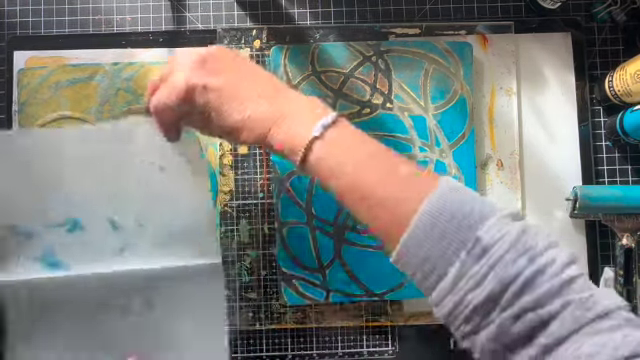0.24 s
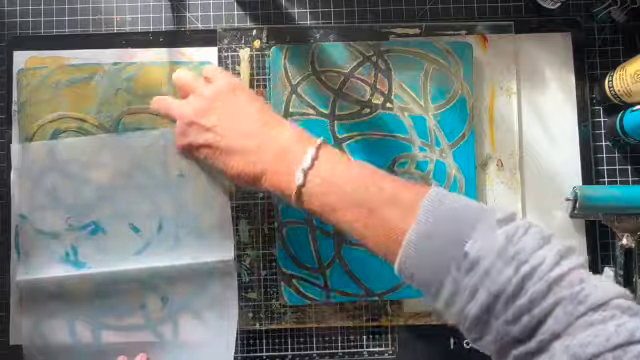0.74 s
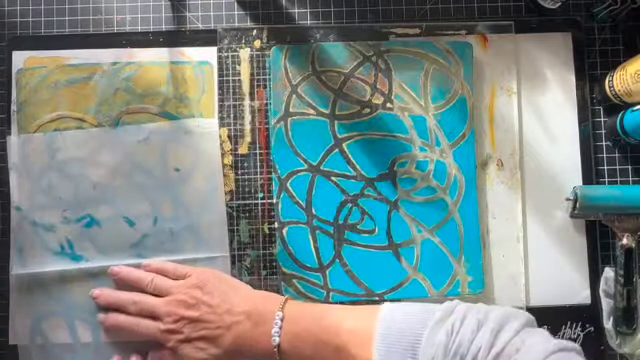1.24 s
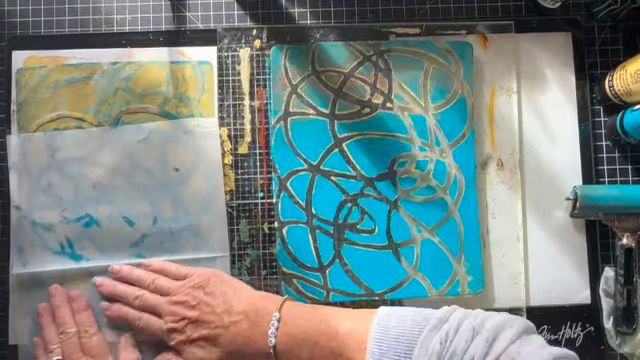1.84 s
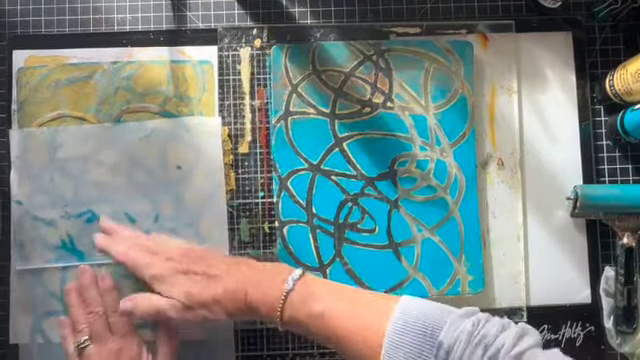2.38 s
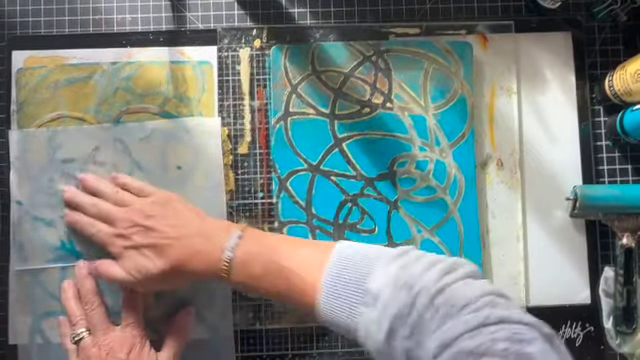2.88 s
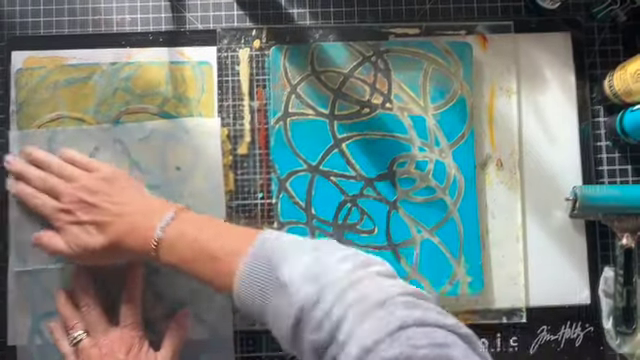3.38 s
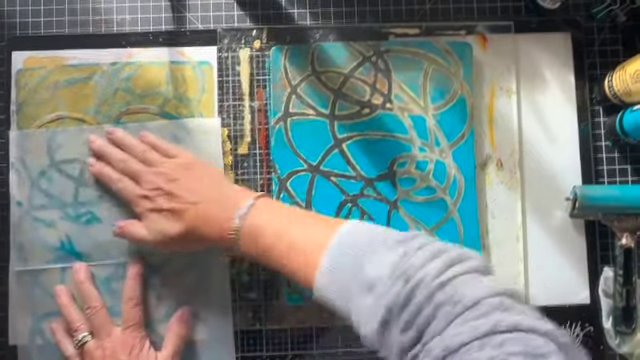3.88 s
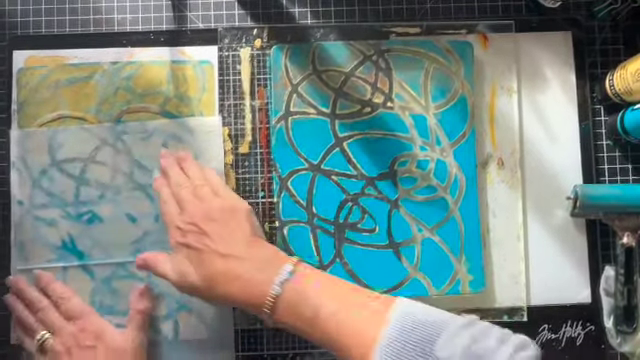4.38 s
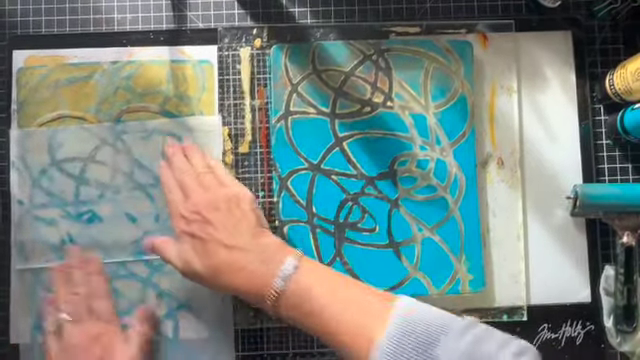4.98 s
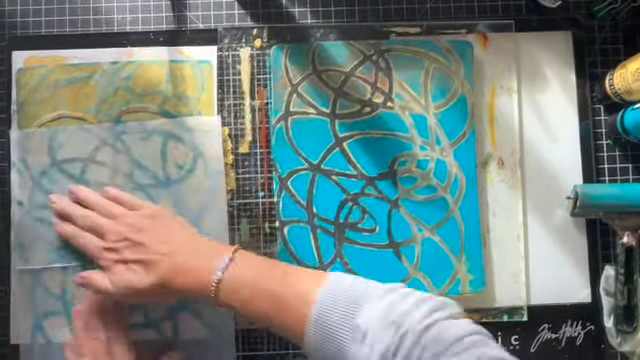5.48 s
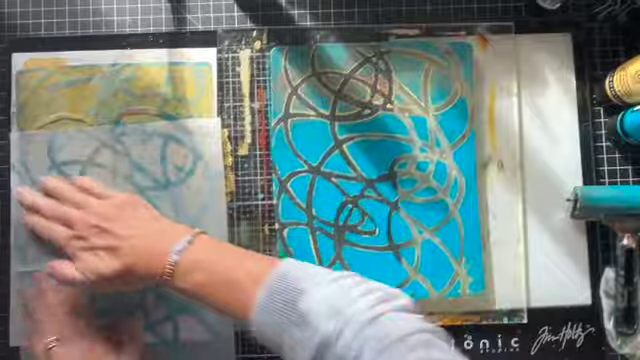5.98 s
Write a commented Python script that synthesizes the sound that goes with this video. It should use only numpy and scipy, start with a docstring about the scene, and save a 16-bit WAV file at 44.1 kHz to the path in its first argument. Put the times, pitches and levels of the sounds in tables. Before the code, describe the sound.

Close up at a craft table in a quiet airy room with a faint low hum, a thin sheet is laid down: irregular crisp snaps, brief crinkles and low air puffs. From two seconds a hand rubs it in short dry hisses, with small ticks, light crackles and hollow knocks, strongest near three and four and a half seconds.

```python
"""A hand rubs a thin sheet of paper flat on a craft table, close under two microphone ports.
Skin hisses as dense noise grains in short strokes; the sheet crinkles as dense ringing grains
and snaps as short pitched flips. The table top drums, knocks and rattles as noise through its modes.
The falling sheet puffs air, small ticks sound, and a machine hums in the airy room."""
import sys
import numpy as np
from scipy import signal
from scipy.fft import rfft, irfft, next_fast_len
from scipy.io import wavfile
from scipy.ndimage import uniform_filter1d

SR = 44100
rng = np.random.default_rng(int(sys.argv[2]) if len(sys.argv) > 2 else 0)


def transcribe(signal):
    """Save signal, clipped to [-1, 1], as a 16-bit WAV file at the path in sys.argv[1]."""
    frames = np.atleast_2d(signal).T
    limited = np.clip(frames, -1, 1)
    pcm = np.round(limited * 32767).astype(np.int16)
    wavfile.write(sys.argv[1], SR, pcm)


N = 274743

# Strokes of the hand. Each row: start in seconds, length in seconds, full hiss level in dB.
STROKES = [(2.002, 0.11, -36.5), (2.171, 0.11, -39.5), (2.349, 0.035, -44), (2.461, 0.21, -45),
           (2.751, 0.095, -41.5), (2.876, 0.13, -41.5), (3.032, 0.12, -40.5), (3.185, 0.13, -41.5),
           (3.347, 0.26, -43.5), (3.659, 0.11, -40), (3.815, 0.098, -45.5), (3.953, 0.17, -43),
           (4.194, 0.11, -38.5), (4.396, 0.16, -33.5), (4.566, 0.17, -38.5), (4.738, 0.14, -35.5),
           (4.889, 0.13, -36), (5.032, 0.15, -39.5), (5.189, 0.29, -39.5), (5.507, 0.13, -39),
           (5.664, 0.1, -37), (5.806, 0.35, -39.5), (6.17, 0.098, -36.5)]
# Hand pressing the table. Each row: time in seconds, rattle of the top in dB, favoured mode in Hz.
PRESSURE = [(0, -59, 395), (1.5, -64, 304), (1.9, -45, 325), (2.4, -66, 460), (2.47, -52.5, 620),
            (2.66, -49, 910), (2.95, -64, 400), (3.05, -33.5, 530), (3.4, -60, 454), (3.74, -55, 424),
            (3.83, -43.5, 586), (3.95, -56.5, 517), (4.12, -40.5, 597), (4.28, -51.5, 594), (4.6, -58, 660),
            (5.3, -57, 594), (5.8, -48, 425), (6.23, -82, 402)]
# Snaps of the sheet. Each row: start in seconds, level in dB, ring in Hz, relative treble in dB.
SNAPS = [(0.229, -21, 1330, -27), (0.3373, -27, 2420, -30), (0.7158, -15, 3270, -12),
         (0.752, -20.5, 2540, -6), (1.085, -35, 2000, -23), (1.2261, -31, 1490, -37),
         (1.303, -32, 2410, -32), (1.3289, -22, 2720, -6), (1.351, -37, 1900, -21),
         (1.3609, -24.5, 1800, -10), (1.577, -30.5, 2260, -10), (1.8021, -12, 2860, -8),
         (1.899, -32.5, 2530, -28), (1.9558, -25, 2870, -47), (2.062, -26, 2680, -13),
         (3.036, -26, 2540, -27), (3.294, -30, 2020, -28), (3.488, -32.5, 1910, -33),
         (3.7195, -24, 1850, -15), (3.843, -33, 1420, -11), (3.854, -22.5, 1940, -13),
         (4.045, -30.5, 1800, -20), (4.0732, -24.5, 2070, -8), (4.295, -32, 2860, -15),
         (4.93, -33, 1500, -10)]
# Small ticks, perhaps a bracelet on the table. Each row: start in seconds, level in dB.
TICKS = [(2.274, -41), (2.4406, -38.5), (2.503, -38), (2.825, -43), (2.948, -41), (3.262, -41),
         (3.779, -38.5), (4.838, -36.5)]
TICK_HZ, TICK_TREBLE_DB = 1010, -37
# Knocks and shoves on the top. Each row: start in seconds, level in dB, favoured mode in Hz,
# rise in seconds.
KNOCKS = [(1.579, -41.5, 630, 0.0025), (2.879, -38, 615, 0.0056), (3.031, -23.5, 1080, 0.012),
          (3.035, -19.5, 590, 0.014), (3.049, -19.5, 290, 0.01), (3.284, -26.5, 550, 0.0028),
          (4.195, -40, 640, 0.0027), (4.217, -28, 550, 0.0028), (4.352, -25, 686, 0.016),
          (4.389, -19, 670, 0.004), (4.405, -25, 382, 0.0033), (4.463, -31, 570, 0.0033),
          (4.524, -40, 600, 0.0044), (4.662, -27.5, 610, 0.0049), (4.684, -25.5, 627, 0.0038),
          (4.748, -30, 636, 0.0036), (4.947, -25, 600, 0.0077), (5.2, -35.5, 635, 0.0076),
          (6.04, -37, 405, 0.029), (6.055, -36.5, 1000, 0.009)]
# Jolts of the whole top. Each row: start in seconds, level in dB, pitch in Hz, decay in seconds.
THUDS = [(1.321, -22, 117, 0.013), (1.36, -27, 74, 0.046), (3.054, -24.5, 71.3, 0.1),
         (3.059, -26.5, 130.4, 0.088), (4.401, -19, 123, 0.017), (5.839, -27, 131.7, 0.056)]
# Air pushed by the falling sheet. Each row: centre in seconds, peak in dB, pitch in Hz.
PUFFS = [(0.629, -23.5, 36.5), (1.047, -30.5, 30.3)]
# Low sway of the table. Each row: time in seconds, level in dB.
DRUMMING = [(0, -43.5), (.9, -58.5), (1.3, -41.5), (1.6, -47), (1.89, -43), (1.97, -48.5), (2.7, -43),
            (2.9, -38.5), (3.4, -44.5), (3.9, -42), (6.23, -46.5)]
# The sheet flaps, slides and buckles. Each row: start in seconds, length in seconds,
# crinkle level in dB, hiss level in dB.
RUSTLES = [(0.004, 0.0038, -19.5, -57), (0.055, 0.0059, -34.5, -65), (0.077, 0.094, -51, -59),
           (0.194, 0.065, -28, -37.5), (0.27, 0.041, -37.5, -49), (0.3, 0.28, -51, -59),
           (0.63, 0.037, -42.5, -49.5), (0.71, 0.0026, -36.5, -25), (0.755, 0.02, -45, -61),
           (1.104, 0.056, -39, -37.5), (1.192, 0.055, -49.5, -44), (1.269, 0.081, -42.5, -39.5),
           (1.575, 0.19, -76, -52), (1.794, 0.042, -70, -43.5), (6.021, 0.06, -48.5, -39)]
# Colour of skin on paper. Each row: frequency in Hz, relative level in dB.
HISS_COLOUR = [(800, -71), (2500, -5), (5200, -2.5), (5900, 4), (8000, 4), (11000, -3.5), (16000, -1.5)]
# Colour of the folding sheet. Each row: frequency in Hz, relative level in dB.
CRINKLE_COLOUR = [(200, -22), (450, 0.5), (1200, 1), (2200, 7), (3300, 3), (5000, 4.5), (12000, -9)]
# Colour of the room's air. Each row: frequency in Hz, relative level in dB.
AIR_COLOUR = [(20, -8.5), (100, 9), (240, -1.5), (600, -15), (2100, -29), (4500, -39), (12000, -75)]
# High modes of the table top. Each row: frequency in Hz, width in Hz, relative gain in dB.
TOP_MODES = [(301.5, 49, 9), (387.5, 30.6, 9), (527, 120, 1.5), (615.4, 22, 4), (673, 46, -1.5),
             (798, 9, 0), (1019, 96, -4.5), (1185, 240, -6.5)]
# Low modes of the table. Each row: frequency in Hz, width in Hz, relative gain in dB.
DRUM_MODES = [(66.9, 9.6, -2), (122.4, 14.8, -7.5), (228, 20.4, -17.5)]
# Spectrum that filters the sum of the two channels. Each row: frequency in Hz, gain in dB.
SUM_SPECTRUM = [(8000, -4), (9800, -7), (10900, -28), (13200, -106), (14200, -4.5), (16000, -6)]
# Spectrum that filters the difference of the two channels. Each row: frequency in Hz, gain in dB.
DIFFERENCE_SPECTRUM = [(120, -25.5), (600, -9.5), (1300, -10.5), (2000, -26), (2700, -9), (5200, -6.5),
                       (6500, -33), (8500, -3), (11000, 0.5)]
# Pitches of the folds in Hz: large folds sound low, small ones high.
FOLD_SIZES_HZ = (720, 1560, 3080)
# Skin slapping the sheet at each knock: frequency in Hz, width in Hz, peak relative to the knock in dB.
SCUFF = (1970, 840, -14.5)

AIR_DB, HUM_DB, HUM_HZ = -48.5, -44, 120  # air as rms, hum as peak
RISE_DB_PER_S, FALL_DB_PER_S = 1494, 474  # edges of a rustle
CRINKLE_OF_STROKE_DB, RESTING_CRINKLE_DB = -19.5, -61  # relative to the stroke's hiss; at rest
RATTLE_OF_RUSTLE_DB = -16  # the top answers a rustle, relative to its crinkle
RATTLE_OF_KNOCK_DB, RATTLE_FALL_DB_PER_S = -15, 168  # the top rattles on after a knock
PLACE_WIDTH_HZ = 340  # modes that one knock reaches
NEAR_WIDTH_HZ, WHOLE_TOP_DB = 300, -2  # reach of the pressed modes; whole top mixed in with them
SCATTER_TURNS_HZ, SCATTER_DECAY_S = 4.5, 0.013
EDGE_HZ = 15950  # upper band limit


def gain_of(db):
    """Turns dB into gain."""
    return 10 ** (np.asarray(db) / 20)


def evened(x):
    """Scales to rms 1."""
    return x / np.sqrt(np.mean(x ** 2) + 1e-20)


def coloured(x, points):
    """Filters by a spectrum of (Hz, dB) points, joined along log frequency."""
    f, db = np.transpose(points)
    size = next_fast_len(len(x))
    hz = np.fft.rfftfreq(size, 1 / SR)
    gain = gain_of(np.interp(np.log(hz + 1), np.log(f + 1), db))
    return irfft(rfft(x, size) * gain, size)[:len(x)]


def ring(x, modes):
    """Sums damped resonances of (Hz, width Hz, dB), as a struck body rings."""
    out = np.zeros(len(x))
    for hz, width, db in modes:
        r = np.exp(-np.pi * width / SR)
        pole = r * np.exp(2j * np.pi * hz / SR)
        out += gain_of(db) * 2 * signal.lfilter([1 - r], [1, -pole], x).real
    return out


def grains(per_s, spread_db, length_s):
    """Noise bursts at random moments, most small, a few large; their power decays in length_s."""
    sizes = gain_of(spread_db * np.minimum(rng.exponential(1, N), 4))
    starts = sizes * (rng.random(N) < per_s / SR)
    fade = np.exp(-1 / (length_s * SR))
    already_sounding = np.mean(starts ** 2) / (1 - fade)
    power = signal.lfilter([1], [1, -fade], starts ** 2, zi=[already_sounding])[0]
    return evened(np.sqrt(power) * rng.standard_normal(N))


def add(mix, s, sound):
    """Mixes a sound in at a time in seconds."""
    part = mix[round(s * SR):][:len(sound)]
    part += sound[:len(part)]


def curve(rows):
    """Gain at every sample of a (s, dB, ..) curve, straight in dB between rows."""
    s, db = np.transpose(rows)[:2]
    return gain_of(np.interp(np.arange(N) / SR, s, db))


def room():
    """Steady air noise of the room and the pure tone of a humming machine."""
    air = evened(coloured(rng.standard_normal(N), AIR_COLOUR))
    hum = np.sin(2 * np.pi * HUM_HZ * np.arange(N) / SR)
    return gain_of(AIR_DB) * air + gain_of(HUM_DB) * hum


def near_hand(x):
    """Favours the modes near the pressing hand with a resonance that moves, at a levelled loudness."""
    s, db, hz = np.transpose(PRESSURE)
    mode_hz = np.interp(np.arange(N) / SR, s, hz)
    turn = np.exp(2j * np.pi * np.cumsum(mode_hz) / SR)
    r = np.exp(-np.pi * NEAR_WIDTH_HZ / SR)
    shifted = x / turn  # brings the favoured mode to 0 Hz
    near = 2 * (turn * signal.lfilter([(1 - r) ** 2], [1, -2 * r, r ** 2], shifted)).real
    level = np.sqrt(uniform_filter1d(near ** 2, size=8000) + 1e-12)
    return evened(near / level + gain_of(WHOLE_TOP_DB) * x)


def pressed_top():
    """Dull pushes of flesh and the rustling sheet rattle the high modes of the top."""
    soft = signal.butter(2, 1400, fs=SR, output="sos")
    pushes = signal.sosfilt(soft, grains(per_s=280, spread_db=4.5, length_s=0.0045))
    shaking = gain_of(RATTLE_OF_RUSTLE_DB) * rustles(axis=2)
    return np.hypot(curve(PRESSURE), shaking) * near_hand(evened(ring(pushes, TOP_MODES)))


def drumming():
    """Noise sways the low modes of the table."""
    return curve(DRUMMING) * evened(ring(rng.standard_normal(N), DRUM_MODES))


def rustles(axis):
    """Gain of one level column of the rustles: quick rise, hold, steady fall in dB."""
    t, power = np.arange(0, N + 64, 64) / SR, 0
    for row in RUSTLES:
        s, length_s, db = row[0], row[1], row[axis]
        rise_db = RISE_DB_PER_S * np.maximum(s - t, 0)
        fall_db = FALL_DB_PER_S * np.maximum(t - s - length_s, 0)
        power = power + gain_of(db - rise_db - fall_db) ** 2
    return np.interp(np.arange(N) / SR, t, np.sqrt(power))


def rubbing():
    """Dense fine slips of skin hiss; folds of three sizes ring and crackle."""
    slips = evened(coloured(grains(per_s=1400, spread_db=1.5, length_s=0.003), HISS_COLOUR))
    sizes = 0
    for hz in FOLD_SIZES_HZ:
        crackle = grains(per_s=450, spread_db=3.4, length_s=0.004)
        sizes = sizes + ring(crackle, [(hz, hz, 0)]) / np.sqrt(hz)
    folds = evened(coloured(sizes, CRINKLE_COLOUR))
    hand = strokes()
    under_hand = gain_of(CRINKLE_OF_STROKE_DB) * hand + gain_of(RESTING_CRINKLE_DB)
    folding = np.hypot(rustles(axis=2), under_hand)
    hissing = np.hypot(rustles(axis=3), hand)
    return hissing * slips + folding * folds


def snaps():
    """A fold flips over: a cycle or two at its pitch and octave, with a short spray of noise."""
    out, t = np.zeros(N), np.arange(9000) / SR
    ticks = [(s, db, TICK_HZ, TICK_TREBLE_DB) for s, db in TICKS]
    for s, db, hz, treble_db in SNAPS + ticks:
        u = hz * t / 0.75  # the swell peaks after three quarters of a cycle
        octave = 2 * gain_of(treble_db) * np.sin(4 * np.pi * hz * t)
        flip = (np.sin(2 * np.pi * hz * t) + octave) * u * np.exp(1 - u)
        colour = [(hz / 6.3, -30), (hz, 0), (9000, treble_db)]
        decay = np.exp(-t / 0.007) + 0.27 * np.exp(-t / 0.038)
        spray = evened(coloured(rng.standard_normal(len(t)), colour)) * decay
        add(out, s, gain_of(db) * (flip + 0.38 * spray))
    return out


def puffs():
    """The falling sheet pushes air: a brief slow swing of pressure each."""
    out, t = np.zeros(N), np.arange(N) / SR
    for s, db, hz in PUFFS:
        u = 2 * np.pi * hz * (t - s)
        out -= gain_of(db) * np.cos(u) * np.exp(-(u / 4) ** 2)
    return out


def thuds():
    """The whole top jolts: a low tone with a fast onset and an exponential decay."""
    out, t = np.zeros(N), np.arange(9000) / SR
    for s, db, hz, decay_s in THUDS:
        envelope = (1 - np.exp(-t / 0.0014)) * np.exp(-t / decay_s)
        add(out, s, gain_of(db) * np.sin(2 * np.pi * hz * t) * envelope)
    return out


def knocks():
    """A blow drives modes near its place, a rattle spreads wider, and skin scuffs the sheet."""
    out, t = np.zeros(N), np.arange(9000) / SR
    for s, db, hz, rise_s in KNOCKS:
        noise = rng.standard_normal(len(t))
        blow = noise * t / rise_s * np.exp(1 - t / rise_s)
        rattle_gain = gain_of(RATTLE_OF_KNOCK_DB - RATTLE_FALL_DB_PER_S * t)
        rattle = noise * np.minimum(t / rise_s, 1) * rattle_gain
        place, wider = [(hz, PLACE_WIDTH_HZ, 0)], [(hz, 2 * PLACE_WIDTH_HZ, 0)]
        knock = ring(ring(ring(blow, place), place) + ring(rattle, wider), TOP_MODES)
        scuff = ring(ring(blow + 2 * rattle, [SCUFF]), [SCUFF])
        knock = knock / abs(knock).max()
        scuff = gain_of(SCUFF[2]) * scuff / abs(scuff).max()
        add(out, s, gain_of(db) * (knock + scuff))
    return out


def strokes():
    """Gain of the hiss: even within a stroke, falling off as the hand speeds up and slows down."""
    t, power = np.arange(0, N + 64, 64) / SR, 0
    for s, length_s, db in STROKES:
        outside = np.maximum(s - t, t - s - length_s)
        slowing = np.maximum(outside + 0.037, 0)  # the fall starts 37 ms inside each end
        power = power + gain_of(db) ** 2 / (1 + (slowing / 0.04) ** 2) ** 3.1
    return np.interp(np.arange(N) / SR, t, np.sqrt(power))


def scene():
    """All sources at the table; scatter that turns steadily sets the left port off from the right."""
    table = pressed_top() + drumming() + knocks() + thuds()
    dry = rubbing() + snaps() + table + puffs() + room()
    decay = np.exp(-np.arange(3000) / SR / SCATTER_DECAY_S)
    scatter = rng.standard_normal((2, 3000)) * decay
    scatter = scatter / np.linalg.norm(scatter[0])
    a, b = signal.oaconvolve(dry[None], scatter, axes=1)[:, :N]
    turn = 2 * np.pi * SCATTER_TURNS_HZ * np.arange(N) / SR
    across = a * np.cos(turn) + b * np.sin(turn)
    return np.array([dry + across, dry - across])


def record(dry):
    """Filters the sum and the difference of the channels, each by its own spectrum; then the band limit."""
    middle = coloured((dry[0] + dry[1]) / 2, SUM_SPECTRUM)
    side = coloured((dry[0] - dry[1]) / 2, DIFFERENCE_SPECTRUM)
    ports = np.array([middle + side, middle - side])
    band_limit = signal.firwin(1023, EDGE_HZ, window=("kaiser", 10), fs=SR)
    return signal.oaconvolve(ports, band_limit[None], "same")


dry = scene()
out = record(dry)
transcribe(out)
```